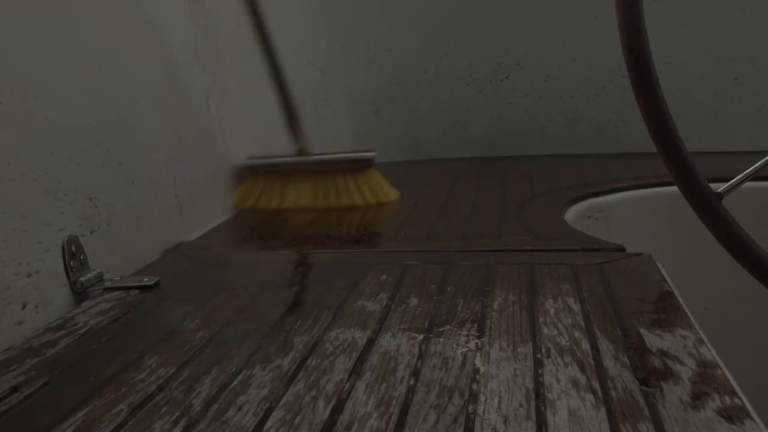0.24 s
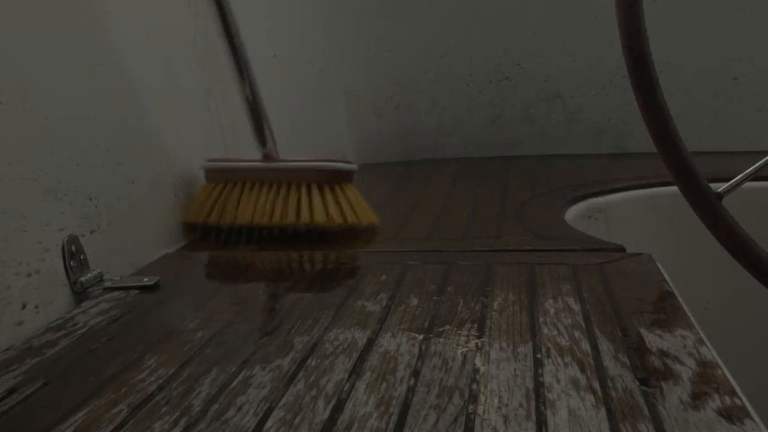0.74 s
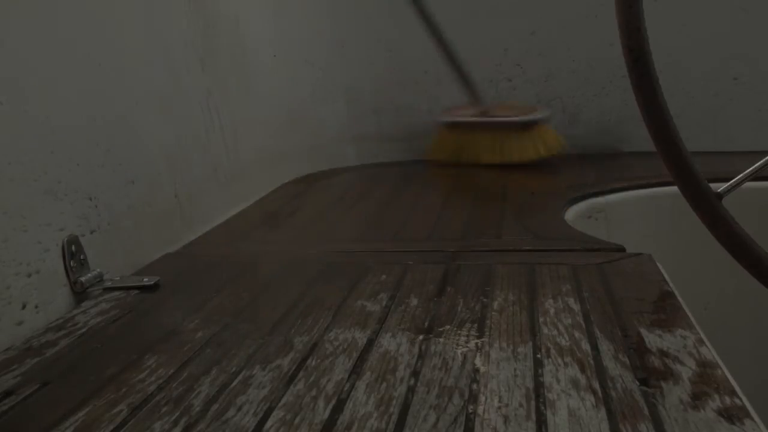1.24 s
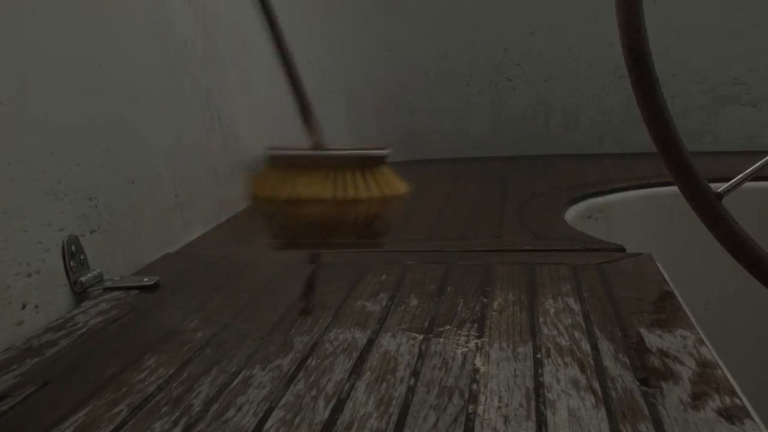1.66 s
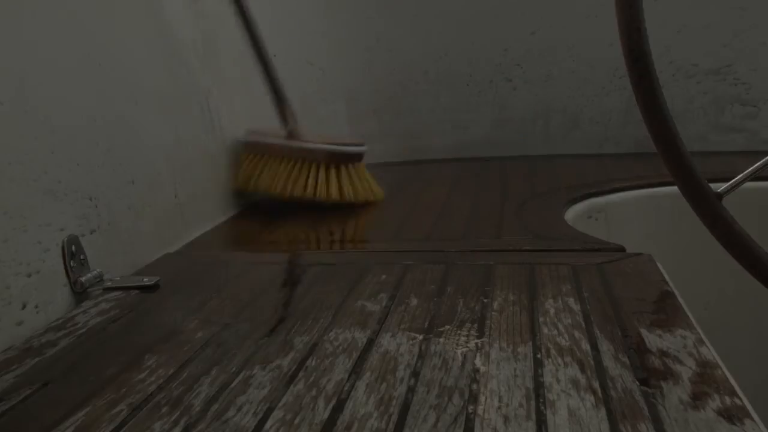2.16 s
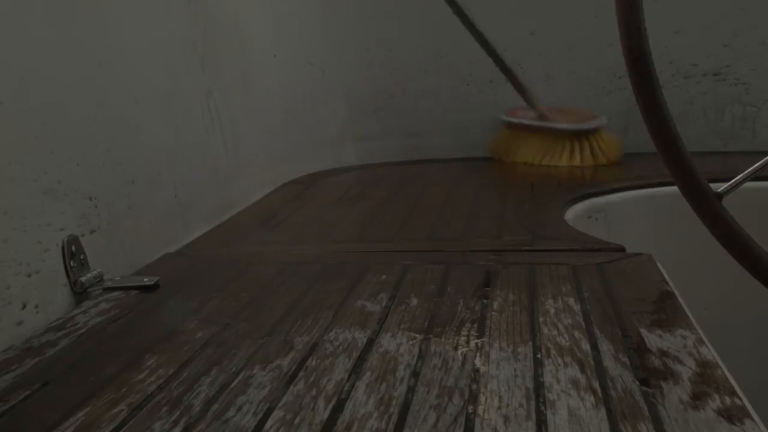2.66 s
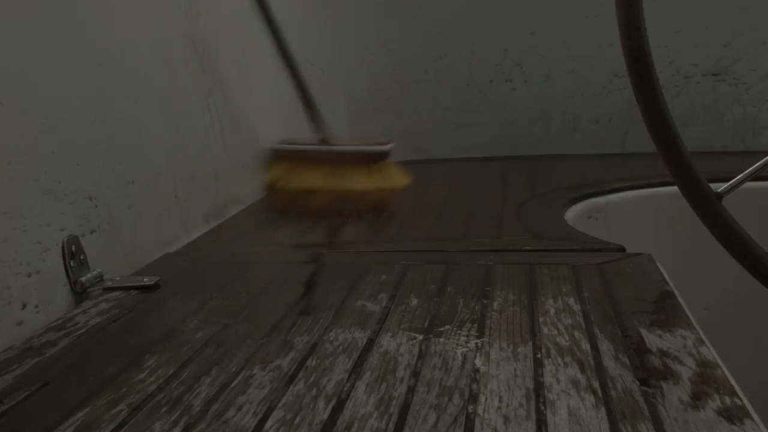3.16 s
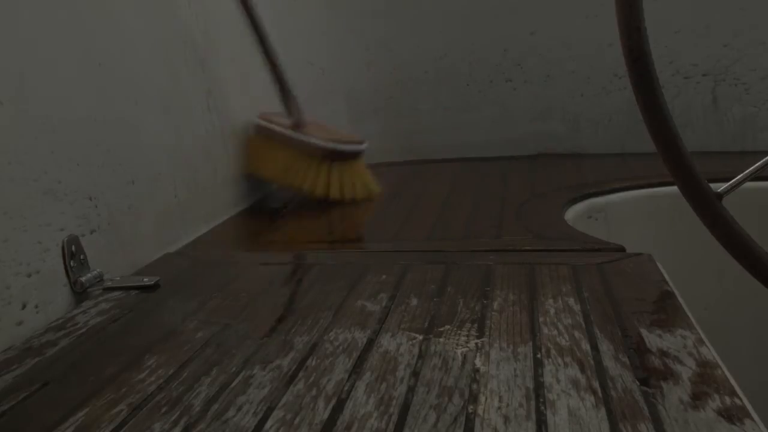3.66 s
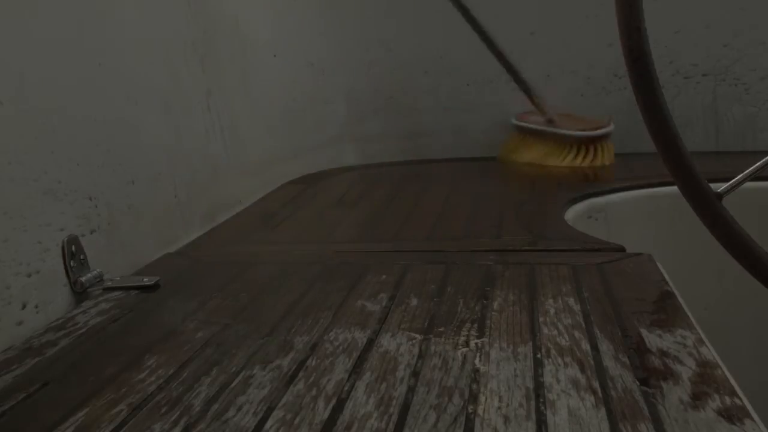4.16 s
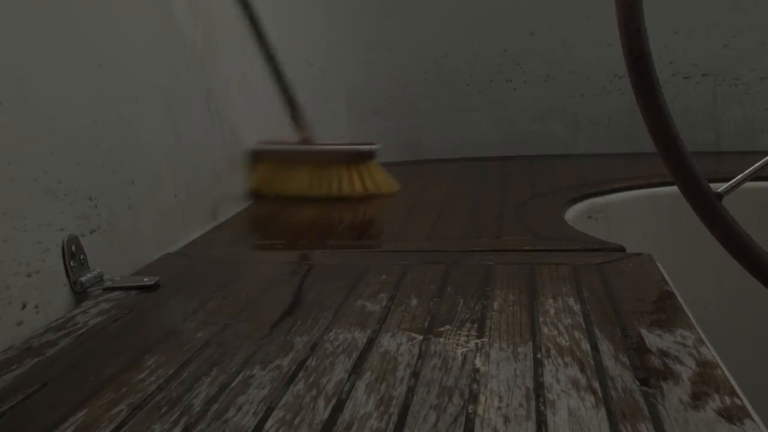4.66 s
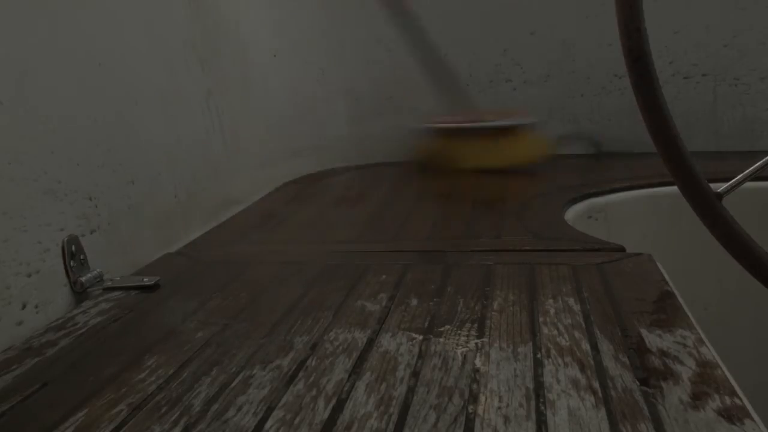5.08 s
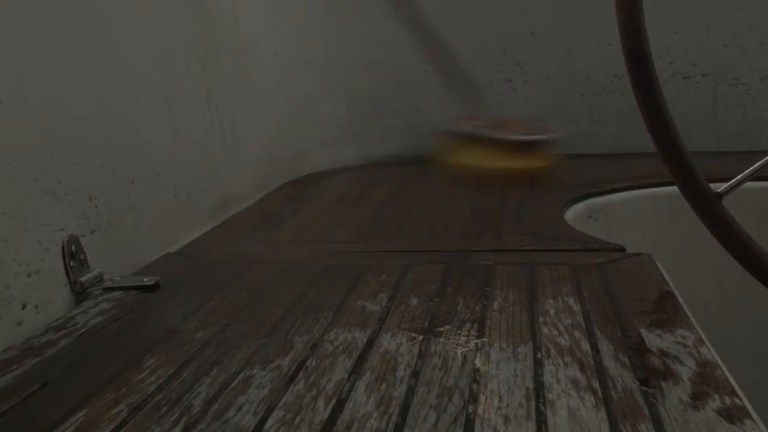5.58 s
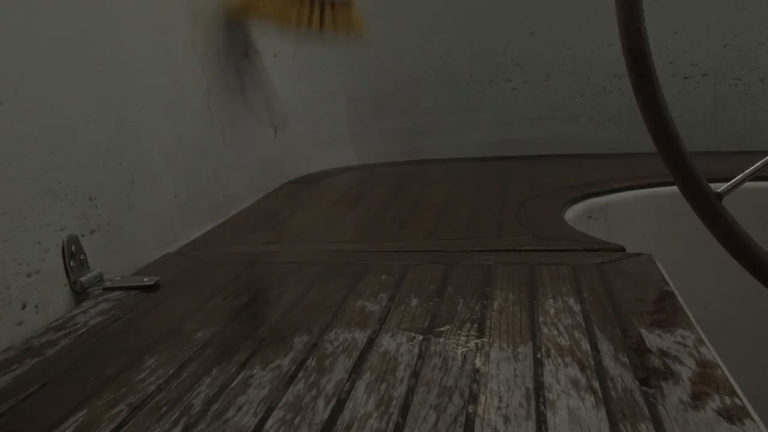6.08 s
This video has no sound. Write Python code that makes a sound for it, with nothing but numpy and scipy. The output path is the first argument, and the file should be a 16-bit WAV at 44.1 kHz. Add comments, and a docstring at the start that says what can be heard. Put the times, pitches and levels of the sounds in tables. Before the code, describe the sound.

Close, raspy deck scrubbing: bristles hiss and chatter in a steady rhythm, with hollow thumps around each pull, then lift away to soft air and hum.

```python
"""Scrubbing a wooden boat deck

A stiff deck brush scrubs wet planks close to the microphone, eight strokes out and back. Bristle slips make
the hiss and rub, and ring the brush as chatter on the push; tufts crunch over, whisk straight and snap free.
The brush head knocks the hollow cockpit side, ringing its modes, mostly around the pulls.
Behind it lie soft filtered-noise air and a distant motor hum of wavering sines."""
import sys
import numpy as np
from scipy import signal
from scipy.fft import rfft, irfft
from scipy.io import wavfile
from scipy.ndimage import uniform_filter1d

SR = 44100
rng = np.random.default_rng(int(sys.argv[2]) if len(sys.argv) > 2 else 0)


def store_pcm(level_fs):
    """Save levels as 16-bit WAV."""
    pcm = np.round(np.clip(level_fs, -1, 1) * 32767).astype(np.int16)
    wavfile.write(sys.argv[1], SR, np.atleast_2d(pcm).T)


N = 279153
T = np.arange(N) / SR


def undb(db):
    """Decibels to gain."""
    return 10 ** (np.asarray(db) / 20)


def unit(x):
    """Scale to rms 1."""
    return x / np.sqrt(np.mean(x ** 2))


def colour(x, points):
    """Filter by a smooth (freq_hz, gain_db) spectrum, falling 17 dB per octave below its first point."""
    hz, db = np.transpose(points)
    f = np.maximum(np.fft.rfftfreq(len(x), 1 / SR), 1)
    gain_db = np.interp(np.log(f), np.log(hz), db)
    gain_db -= 17 * np.maximum(np.log2(hz[0] / f), 0)
    return irfft(rfft(x) * undb(gain_db), len(x))


def resonate(x, hz, width_hz):
    """One resonance with gain 1 at its centre."""
    return signal.lfilter(*signal.iirpeak(hz, hz / width_hz, fs=SR), x)


def walk(rate_hz):
    """Random levels held 1 / rate_hz s and slewed twice; spread near 1."""
    k = max(int(SR / rate_hz), 1)
    steps = np.repeat(rng.standard_normal(N // k + 1), k)
    return 1.32 * uniform_filter1d(uniform_filter1d(steps, k), k)[:N]


def slips(rate_hz, spread_db):
    """Tiny clicks of uneven size and random sign, rate_hz a second, one for each bristle that slips."""
    chance, size = rng.random(N), rng.standard_normal(N)
    clicks = (chance < rate_hz / SR) * rng.choice([-1, 1], N)
    return unit(clicks * undb(spread_db * size) / np.sqrt(rate_hz))


def burst(start_s, rise_s, t60_s):
    """Envelope that swells from start_s and dies away, cut after 0.5 s."""
    first = int(start_s * SR)
    age = T[:min(SR // 2, N - first)]
    envelope = (1 - np.exp(-age / rise_s)) * np.exp(-np.log(1000) * age / t60_s)
    return np.pad(envelope, (first, N - first - len(age)))


# outdoor air spectrum: freq_hz, gain_db
AIR_COLOUR = [(25, -7.5), (55, -1), (90, 4), (170, -5), (300, -7), (540, -10), (1150, -14.5), (1800, -23),
              (3700, -24.5), (5500, -37.5), (15000, -44.5)]
AIR_DB = -43.5


def harbour_air():
    """Soft outdoor air: coloured noise that swells slightly."""
    air = unit(colour(rng.standard_normal(N), AIR_COLOUR))
    return air * undb(AIR_DB + 0.49 * walk(4.8))


# motor partials: freq_hz, start_db, end_db
MOTOR_PARTIALS = [(51.3, -58, -51), (64, -47.5, -43), (127, -74.5, -44.5), (193.4, -46, -57.5),
                  (394, -53, -55), (1217, -83, -54.5)]


def motor_hum():
    """Distant motor: partials share one pitch drift and waver separately in level."""
    drift = 1 + 0.00372 * walk(1.3)
    hum = 0
    for hz, start_db, end_db in MOTOR_PARTIALS:
        db = start_db + (end_db - start_db) * T / T[-1] + walk(6.8)
        hum = hum + undb(db) * np.sqrt(2) * np.sin(2 * np.pi * np.cumsum(hz * drift) / SR)
    return hum


def decaying_mode(t, hz, t60_s):
    """Free ringing of one panel mode."""
    return np.cos(2 * np.pi * hz * t) * np.exp(-np.log(1000) * t / t60_s)


# modes of hollow deck and cockpit side: freq_hz, level_db, t60_s
HULL_MODES = [(92, -17, .17), (120, -16, .2), (151, -8, .22), (172, -9, .2), (199, -7, .21),
              (221, -11, .19), (242, -10, .21), (290, -4, .19), (362, -2.5, .14), (396, -5, .14),
              (478, -3, .12), (530, -5, .1), (574, -2.5, .1), (705, -11, .12), (1206, -9, .06)]
# clack spectrum of the brush block: freq_hz, gain_db
CLACK_COLOUR = [(300, 1), (700, -3.5), (1700, -3.5), (2400, -6.5), (3300, -1.5), (4300, -14), (5600, -8.5),
                (8000, -21.5), (15000, -24)]
# brush-head blows: start_s, level_db, contact_ms, panel_hz, clack_re_thud_db
KNOCKS = [(.863, -22.5, 3.9, 175, -27), (1.416, -17, 3.45, 235, -13.5), (1.762, -31.5, 3.5, 159, -25),
          (2.098, -12, 2.6, 235, -5), (2.847, -7.5, 1.84, 250, -3.5), (3.596, -11, 1.94, 179, -2),
          (4.377, -10, 2.3, 258, -3), (5.164, -5.5, 1.44, 273, -2), (5.524, -20.5, 4.1, 153, -6),
          (6.008, -12, 2.8, 230, -11.5)]


def knocks():
    """The head pushes the hollow side into its modes; the block clacks, and again as the handle takes up play."""
    t = np.arange(SR // 2) / SR
    modes = np.array([undb(db) * decaying_mode(t, hz, t60_s) for hz, db, t60_s in HULL_MODES])
    radiation = signal.butter(2, 90, "high", fs=SR, output="sos")  # a panel radiates little bass
    thuds, clacks = np.zeros(N + len(t)), 0
    for start_s, db, contact_ms, panel_hz, clack_db in KNOCKS:
        # each blow lands on another spot: that panel swings hard and briefly, the hull rings on
        spot_gains = undb(2.7 * rng.standard_normal(len(HULL_MODES)))
        ring = undb(4) * decaying_mode(t, panel_hz, 0.074) + spot_gains @ modes
        push = np.sin(np.pi * np.minimum(t * 1000 / contact_ms, 1)) ** 2
        thud = signal.sosfilt(radiation, signal.fftconvolve(ring, push)[:len(t)])
        thud = thud / np.std(thud[:SR // 50])
        # a brief 34 Hz low thump under each knock, as from an overloaded microphone
        low_thump = undb(db - 7.5) * np.sin(2 * np.pi * 34 * t) * np.exp(-t / .02)
        first = int(start_s * SR)
        thuds[first:first + len(t)] += undb(db) * (thud + low_thump)
        block = 1.93 * burst(start_s + 0.00077, 0.00018, 0.033)
        handle = 0.46 * burst(start_s + 0.0078, 0.00044, 0.13)
        clacks = clacks + undb(db + clack_db + 1.0) * (block + handle)
    grain = slips(6000, spread_db=3)
    return thuds[:N] + clacks * unit(colour(grain, CLACK_COLOUR))


# wet bristles snap free: start_s, level_db
SNAPS = [(0.024, -31), (0.076, -33), (0.77, -23.5), (3.176, -17), (4.523, -32), (5.729, -26), (6.013, -43)]


def snaps():
    """A few bristles spring loose together with a bright tick."""
    envelope = sum(undb(db) * burst(start_s, 0.00088, 0.028) for start_s, db in SNAPS)
    return unit(resonate(slips(4100, spread_db=5), 2900, 2300)) * envelope


# crunch spectrum: freq_hz, gain_db
FLIP_COLOUR = [(150, -4), (330, 1), (580, -4.5), (850, -6), (1150, -8.5), (1400, -8), (2000, -10.5),
               (3400, -18), (7000, -24)]
# tufts flip over or catch on a seam: start_s, level_db, pitch_hz
FLIPS = [(0.13, -26, 576), (0.537, -28, 706), (0.77, -30.5, 500), (0.833, -25.5, 1010), (1.275, -23.5, 600),
         (1.547, -37.5, 990), (1.621, -31, 1020), (1.993, -25, 725), (2.732, -25, 646),
         (2.997, -34.5, 1040), (3.479, -24.5, 620), (3.768, -31.5, 1000), (3.856, -30.5, 1100),
         (4.269, -26.5, 780), (5.024, -22.5, 630), (5.311, -31, 1000)]


def flips():
    """Tufts fold over or catch on a seam in a short dull crunch."""
    crunch = unit(colour(slips(2200, spread_db=1), FLIP_COLOUR))
    out = 0
    for start_s, db, hz in FLIPS:
        pitched = unit(resonate(crunch, hz, 0.45 * hz))
        out = out + undb(db - 3.0) * burst(start_s, 0.0012, 0.18) * (crunch + 0.65 * pitched)
    return out


# pushes away, the tips glide, then bite and chatter until the brush stops:
# bite_s, glide_before_bite_s, bite_to_stop_s, pressure_crest_share (of bite to stop, 0-1),
# glide_db, slide_db, chatter_db, whisk_db
PUSHES = [(.319, 0.2, 0.14, 0.39, -32, -22, -19, -31.5), (0.963, 0.17, 0.24, 0.41, -29, -16, -13.5, -27),
          (1.697, 0.11, 0.22, 0.38, -27.5, -15.5, -11.5, -31),
          (2.404, 0.12, .25, 0.38, -30, -15.5, -10.5, -30),
          (3.169, 0.12, 0.24, .27, -28.5, -13.5, -12, -30.5),
          (3.937, 0.11, 0.24, 0.4, -26, -15, -9.5, -32.5), (4.695, 0.11, 0.26, 0.44, -29, -14, -10, -31),
          (5.468, 0.1, 0.24, 0.33, -29.5, -13.5, -10.5, -34.5)]
WHISK_DELAY_S, WHISK_WIDTH_S = 0.028, 0.021  # delay from the stop of each push


def whisks():
    """A short bright swish as the bristles straighten after each push."""
    envelope = 0
    for bite_s, _, push_s, *_, whisk_db in PUSHES:
        offset = (T - bite_s - push_s - WHISK_DELAY_S) / WHISK_WIDTH_S
        envelope = envelope + undb(whisk_db) * np.exp(-np.minimum(offset ** 2, 20))
    swish = colour(slips(3600, spread_db=2), HISS_COLOUR)
    ring = unit(resonate(slips(3000, spread_db=6.5), 2740, 2900))
    return unit(swish + 0.31 * ring) * envelope


def push_progress():
    """How far the bristles have bent since the bite (0-1), and whether they are biting (0-1)."""
    spans = [(bite_s, bite_s + push_s) for bite_s, _, push_s, *_ in PUSHES]
    progress = np.interp(T, np.ravel(spans), np.tile([0, 1], len(spans)))
    pushing = sum((T > a) & (T < b) for a, b in spans)
    return progress, uniform_filter1d(1. * pushing, size=700)


EASE_POWER = 1.446  # how softly the arm starts and stops


def swing(start_s, end_s, attack_s, release_s):
    """Envelope of an arm movement: eases in, holds, eases out."""
    ramp = np.clip(np.minimum((T - start_s) / attack_s, (end_s - T) / release_s), 0, 1)
    moving = ramp > 0
    ramp[moving] = np.sin(np.pi / 2 * ramp[moving]) ** EASE_POWER
    return ramp


# pulls back, a fast sweep, then the unloaded brush trails to rest:
# start_s, sweep_s, whole_pull_s, sweep_db, trail_db
PULLS = [(.51, 0.25, .28, -30, -47), (1.258, 0.21, 0.3, -21.5, -36.5), (1.973, 0.18, 0.28, -20, -34.5),
         (2.714, 0.19, 0.34, -20, -38.5), (3.46, 0.18, 0.34, -19, -37.5), (4.242, 0.19, .33, -20, -36.5),
         (5.004, 0.21, 0.38, -18.5, -43.5), (5.72, 0.089, 0.1, -30.5, -54)]
SWEEP_ATTACK_S, SWEEP_RELEASE_S, TRAIL_RELEASE_S = 0.097, 0.082, 0.037
REST_DB = -49.5  # floor of the sliding level
# trailing bristles barely chatter: level at a slide of 0 dB, dB per dB of slide
PULL_CHATTER_DB, PULL_CHATTER_GROWTH = -23, 0.42
GLIDE_ATTACK_S, GLIDE_RELEASE_S = 0.14, 0.069
GLIDE_CHATTER_DB = 3.5  # chatter re glide
GLIDE_FADE = 0.52  # share of the glide that is left when the bent tufts stop
# the arm speeds up before the bite and is fastest this share of the way from bite to stop
SURGE_LEAD_S, FASTEST_SHARE, SURGE_RELEASE_S = 0.051, 0.59, .1
# pressure falls away on both sides of its crest
BITE_S, CHATTER_SAG_DB_PER_S, UNLOAD_S = .012, 73, 0.084


def stroke_levels():
    """Levels (dB) of sliding, which follows speed, and of chatter, which follows pressure, over all strokes."""
    slide = undb(REST_DB)
    for start_s, sweep_s, pull_s, sweep_db, trail_db in PULLS:
        sweep = undb(sweep_db) * swing(start_s, start_s + sweep_s, SWEEP_ATTACK_S, SWEEP_RELEASE_S)
        trail = undb(trail_db) * swing(start_s, start_s + pull_s, SWEEP_ATTACK_S, TRAIL_RELEASE_S)
        slide = np.maximum(slide, np.maximum(sweep, trail))
    grip = undb(PULL_CHATTER_DB) * slide ** PULL_CHATTER_GROWTH
    for bite_s, glide_s, push_s, crest_share, glide_db, slide_db, chatter_db, _ in PUSHES:
        stop_s = bite_s + push_s
        fastest_s, hardest_s = bite_s + FASTEST_SHARE * push_s, bite_s + crest_share * push_s
        glide = swing(bite_s - glide_s, stop_s + WHISK_DELAY_S, GLIDE_ATTACK_S, GLIDE_RELEASE_S)
        glide = undb(glide_db) * glide * np.interp(T, [fastest_s, stop_s], [1, GLIDE_FADE])
        surge_attack_s = fastest_s - bite_s + SURGE_LEAD_S
        surge = undb(slide_db) * swing(bite_s - SURGE_LEAD_S, stop_s, surge_attack_s, SURGE_RELEASE_S)
        pressure_db = chatter_db - CHATTER_SAG_DB_PER_S * np.abs(T - hardest_s)
        press = undb(pressure_db) * swing(bite_s, stop_s, BITE_S, UNLOAD_S)
        slide = np.maximum(slide, np.maximum(glide, surge))
        grip = np.maximum(grip, np.maximum(undb(GLIDE_CHATTER_DB) * glide, press))
    return 20 * np.log10(slide), 20 * np.log10(grip)


# plank rub spectrum: freq_hz, gain_db
RUB_COLOUR = [(120, 3.5), (330, 0), (520, 1.5), (700, 1.5), (1000, 2.5), (1400, 3.5), (1900, -4.5),
              (3500, -42)]


def rub(slide_db, bend):
    """Tufts bump over the planks: a patchy low rustle that grows with speed and fades as they lie flat."""
    db = -27 + 0.43 * slide_db - 9 * bend
    return unit(colour(slips(2500, spread_db=0), RUB_COLOUR)) * undb(db + 4.27 * walk(45))


# resonances of brush block and bristles: freq_hz, width_hz, level_db
BRUSH_MODES = [(1370, 180, -5.5), (2060, 750, 1.5), (2760, 416, -4.5), (3080, 150, -9.5), (3375, 570, 3.5),
               (3530, 280, -0.5), (4040, 250, -11), (4570, 1900, -2.5), (5770, 1800, -8)]


def chatter(db, progress, pushing):
    """Stick-slip rings the brush; as bristles bend under the push its low resonances drop out one by one."""
    edge_hz = 1500 * 2 ** (1.67 * progress)
    out, power = 0, 0
    for hz, width_hz, mode_db in BRUSH_MODES:
        ring = resonate(resonate(slips(2500, spread_db=-1), hz, width_hz), hz, 4 * width_hz)
        octaves = np.log2(hz / edge_hz)
        pushed_db = 15 * np.minimum(octaves, 0) - 2.1 * np.maximum(octaves, 0)
        trailing_db = -3 * np.abs(np.log2(hz / 3400))
        gain = undb(mode_db + pushing * pushed_db + (0.5 - pushing) * trailing_db)
        out = out + unit(ring) * gain * undb(2.5 * walk(45))
        power = power + gain ** 2
    return out / np.sqrt(power) * undb(db - 6.0 + 1.7 * pushing)


# sliding-tip spectrum: freq_hz, gain_db
HISS_COLOUR = [(1200, -13), (2600, -10), (3400, -0.5), (4300, -3.5), (5200, -3), (7200, -0.5), (9000, -3),
               (11000, -6.5), (13500, -10.5), (16000, -14)]


def hiss(db, pushing):
    """Tips slide over wet grain: more slips at speed, and a finer spray except while the bristles bite."""
    rate_hz = 11000 * undb(.4 * (db + 20))
    tips = unit(colour(slips(rate_hz, spread_db=2.5), HISS_COLOUR))
    spray = unit(resonate(slips(9000, spread_db=3), 10800, 5300))
    return tips * undb(db - 3.5 + 1.0 * walk(60)) + spray * (1 - pushing) * undb(db - 7)


LIFT_S, LIFT_FADE_DB_PER_S = 5.8, 300  # the brush leaves the deck


def scene():
    """All sources reach one microphone."""
    slide_db, chatter_db = stroke_levels()
    progress, pushing = push_progress()
    strokes = rub(slide_db, progress * pushing) + chatter(chatter_db, progress, pushing) + hiss(slide_db, pushing)
    on_deck = undb(-LIFT_FADE_DB_PER_S * np.maximum(T - LIFT_S, 0))
    background = harbour_air() + motor_hum()
    sound = background + knocks() + snaps() + flips() + whisks() + on_deck * strokes
    return np.array([sound, sound])


LEFT_RE_RIGHT_DB, TOP_HZ, CEILING = -7, 15800, 0.63


def record(dry):
    """The microphone overloads smoothly on the loudest peaks; the right channel is louder; the top is cut."""
    clipped = dry / (1 + (dry / CEILING) ** 8) ** (1 / 8)
    sides = undb(np.array([[LEFT_RE_RIGHT_DB], [0]]))
    low_pass = signal.ellip(10, .2, 70, TOP_HZ, fs=SR, output="sos")
    return signal.sosfilt(low_pass, clipped * sides / sides.mean())


dry = scene()
out = record(dry)
store_pcm(out)
```